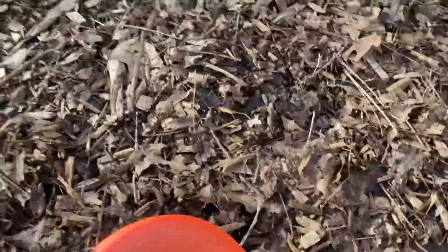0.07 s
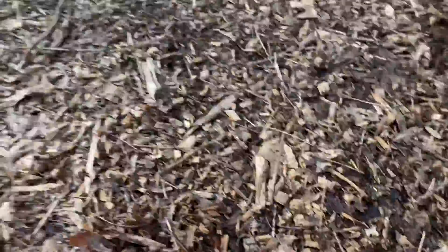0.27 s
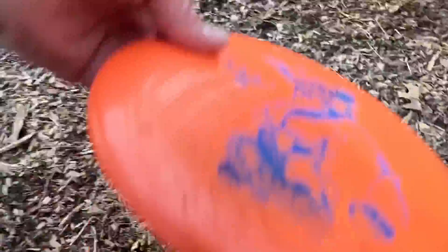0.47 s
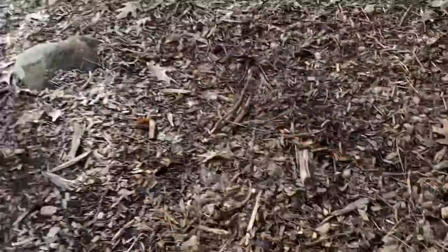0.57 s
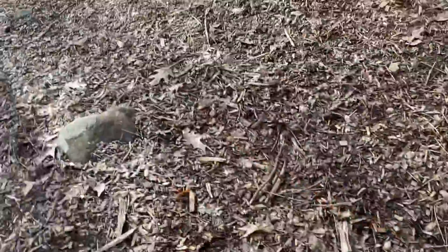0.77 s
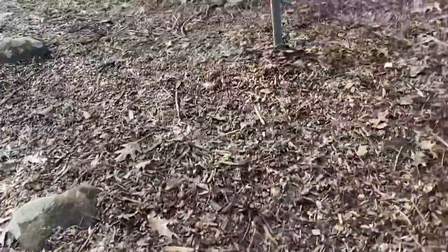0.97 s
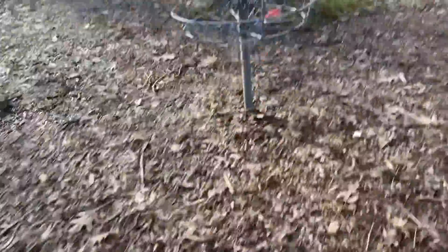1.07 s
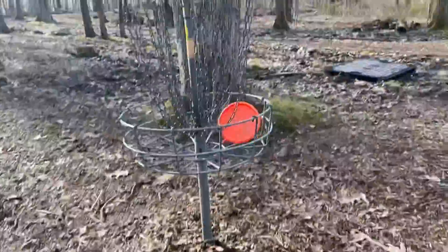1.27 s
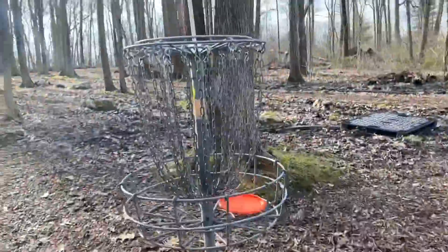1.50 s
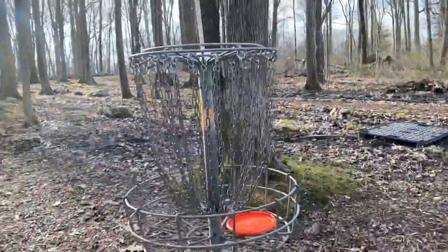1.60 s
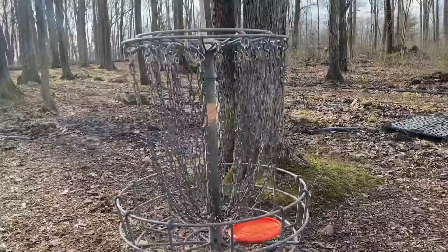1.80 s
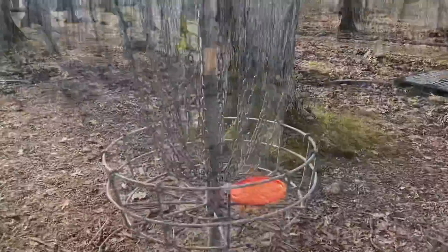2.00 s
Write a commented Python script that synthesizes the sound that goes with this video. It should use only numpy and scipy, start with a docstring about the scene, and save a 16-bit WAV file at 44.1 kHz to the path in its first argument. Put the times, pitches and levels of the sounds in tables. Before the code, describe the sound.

A disc hits a basket's metal chains with a bright clash and jangle in quiet woods.

```python
"""Disc into a chain basket, quiet woods

A plastic disc flies into the chains of a steel basket, knocks against the pole, drops into the
wire tray and settles. The links clash and jingle in surges as the chains swing; pole and tray
ring on, with a weak tail from the trees. Air buffets the moving microphone. A faint chirp
comes from far off, and dry leaves crunch underfoot before the hit and again near the end."""
import sys
import numpy as np
from scipy import signal
from scipy.fft import rfft, irfft, next_fast_len
from scipy.io import wavfile
from scipy.ndimage import uniform_filter1d

SR = 44100
rng = np.random.default_rng(int(sys.argv[2]) if len(sys.argv) > 2 else 0)


def to_wav(s):
    """Save 16-bit WAV."""
    ch = np.atleast_2d(s).T  # columns
    pcm = np.round(np.clip(ch, -1, 1) * 32767)  # PCM
    wavfile.write(sys.argv[1], SR, pcm.astype(np.int16))


N = 90404
TIME = np.arange(N) / SR


def from_db(db):
    """Decibels to gain."""
    return 10 ** (np.asarray(db) / 20)


def at_hz(spectrum, hz):
    """Read a spectrum's level in dB along a log-frequency axis."""
    f, db = np.transpose(spectrum)
    return np.interp(np.log(hz + 1e-3), np.log(f), db)


def level(curve):
    """A dB curve over time as a gain per sample."""
    return from_db(np.interp(TIME, *np.transpose(curve)))


def colour(x, spectrum):
    """Causal (minimum-phase) filter with the given spectrum."""
    size = 2 * next_fast_len(N)
    hz = np.arange(size // 2 + 1) * SR / size
    cepstrum = irfft(np.log(from_db(at_hz(spectrum, hz))))
    cepstrum[1:size // 2] *= 2
    cepstrum[size // 2 + 1:] = 0
    return irfft(rfft(x, size) * np.exp(rfft(cepstrum)))[..., :N]


def noise(spectrum, side_db, envelope=0.99):
    """Stereo noise under an envelope, then coloured; rms 1 where the envelope is 1."""
    mid, side = rng.standard_normal((2, N))
    white = mid + from_db(side_db) * side * [[1], [-1]]
    return colour(envelope * white, spectrum) / np.std(colour(white, spectrum))


def turbulence(spectrum):
    """Low eddy noise, its level evened over a few cycles."""
    eddies = noise(spectrum, side_db=-12.5)
    power = uniform_filter1d(np.mean(eddies ** 2, axis=0), size=1500)
    return eddies / np.sqrt(power + 1e-9)


def rms_one(x):
    """Scale to rms 1."""
    return x / np.sqrt(np.mean(x ** 2) + 1e-20)


def clicks(times, sizes):
    """Impulses at the given times in seconds."""
    samples = np.clip(np.ravel(times) * SR, 0, N).astype(int)
    return np.bincount(samples, np.ravel(sizes), N + 1)[:N]


def fade(x, decay_s):
    """Each impulse becomes an exponential decay."""
    return signal.lfilter([1], [1, -np.exp(-1 / (decay_s * SR))], x + 1e-18)


def ring(force, hz, t60, phase):
    """One mode, reaching the microphone with a left-right phase difference in radians."""
    pole = from_db(-60 / (t60 * SR)) * np.exp(2j * np.pi * hz / SR)
    motion = signal.lfilter([1], [1, -pole], force + 1e-18)
    mid, side = motion.imag * np.cos(phase / 2), motion.real * np.sin(phase / 2)
    return np.array([mid + side, mid - side])


def uneven(shape, spread_db=4.5):
    """Strengths of contacts, with random sign; rms 1 along each row."""
    sizes = from_db(spread_db * rng.standard_normal(shape)) * rng.choice([-1, 1], shape)
    return sizes / np.sqrt(np.mean(sizes ** 2, axis=-1, keepdims=True))


# Airflow right on the microphone: t/s, level/dB
BUFFET_LEVEL = [(0, -40), (.3, -35.5), (.6, -28), (.68, -32), (.97, -28), (1.035, -42.5), (1.13, -40.5),
                (1.22, -40), (1.36, -49), (1.55, -48.5), (1.72, -39), (1.85, -42), (2.05, -45.5)]
# Its rumble: f/Hz, level/dB
BUFFET_SPECTRUM = [(15, -28), (35, -15.5), (55, 1), (85, 3), (125, -4), (200, -16.5), (600, -50),
                   (5000, -92)]
def buffeting():
    """Eddies rumble on the moving microphone."""
    return level(BUFFET_LEVEL) * turbulence(BUFFET_SPECTRUM)


# Air of the woods, far off: f/Hz, level/dB
HUSH_SPECTRUM = [(100, -12.5), (250, -2.5), (500, -6), (950, 2.5), (1600, -8), (3000, -18.5), (7500, -33),
                 (11000, -27), (13000, -40.5)]
def hush():
    """A steady, wide hush lies behind everything."""
    return from_db(-48) * noise(HUSH_SPECTRUM, side_db=1)


# Faint rustle around the microphone: t/s, level/dB
RUSTLE_LEVEL = [(0, -63), (.3, -57), (.72, -56), (.85, -62), (2.05, -66.5)]
# Its hiss: f/Hz, level/dB
RUSTLE_SPECTRUM = [(1000, -7), (2500, 3), (4500, 3), (7200, 1), (8700, -11), (11000, -5.5), (13500, -28)]
def rustle(grain_s=0.0026, spread_db=1.5):
    """Dry leaves shift in tiny grains of uneven strength."""
    grains = rms_one(uniform_filter1d(rng.standard_normal(N), size=int(grain_s * SR)))
    envelope = rms_one(from_db(spread_db * grains))
    return level(RUSTLE_LEVEL) * noise(RUSTLE_SPECTRUM, side_db=-2, envelope=envelope)


# Pitch of a far chirp: t/s, f/Hz
CHIRP_PITCH = [(0.195, 4200), (0.275, 4450), (0.295, 4980), (0.34, 4900), (0.38, 4400)]
def chirp():
    """A thin, fluttering whistle swells, rises and falls."""
    times, hz = np.transpose(CHIRP_PITCH)
    progress = np.interp(TIME, [times[0], times[-1]], [0, 1])
    swell = np.sqrt(np.abs(np.sin(np.pi * progress)))
    flutter = rms_one(uniform_filter1d(uniform_filter1d(rng.standard_normal(N), size=120), size=120))
    phase = 2 * np.pi * np.cumsum(np.interp(TIME, times, hz)) / SR
    return from_db(-60.5) * swell * flutter * np.sin(phase)


# Gusts right on the microphone: t/s, level/dB, half length/s
GUSTS = [(0.293, -28, 0.024), (0.652, -24.5, 0.0059), (0.839, -19.5, 0.012), (0.897, -23, 0.012),
         (1.169, -31.5, 0.044)]
# Their thump: f/Hz, level/dB
GUST_SPECTRUM = [(25, -9.5), (85, 3.5), (150, -0.5), (240, -12.5), (700, -50.5), (5000, -78)]
def gusts():
    """Single puffs of air thump on the microphone, each a bell-shaped swell."""
    envelope = sum(from_db(db) * np.exp(-0.5 * ((TIME - s) / half) ** 2) for s, db, half in GUSTS)
    return envelope * turbulence(GUST_SPECTRUM)


# Leaves and twigs underfoot: t/s, level/dB, decay/s
CRUNCHES = [(0.334, -44, 0.0025), (0.47, -44.5, 0.01), (0.871, -45, 0.006), (0.903, -45, 0.01),
            (0.925, -42, 0.005), (2.003, -45, 0.025), (2.027, -26, 0.00077)]
# Their crunch: f/Hz, level/dB
CRUNCH_SPECTRUM = [(150, 2), (500, -1.5), (1000, 7), (1600, -1), (2500, -1), (3200, -13.5), (14000, -30)]
def leaves():
    """Dry leaves crunch in short bursts, a little right of the microphone."""
    envelope = sum(fade(clicks(s, from_db(db)), decay_s) for s, db, decay_s in CRUNCHES)
    return noise(CRUNCH_SPECTRUM, side_db=-6.5, envelope=envelope) * from_db([[-1.5], [1.5]])


# Clashes of the chains in the basket: t/s, level/dB, decay/s,
# then offsets for low link modes/dB, high link modes/dB, shaking of the basket/dB
SURGES = [(1.0758, -14.5, 0.046, 1.5, -11, -5), (1.107, -20, 0.029, 5.5, -25, -14),
          (1.185, -20.5, 0.022, -1.5, 3.5, -25), (1.235, -22, 0.023, -3, 3, 8.5),
          (1.268, -10, .025, -7.5, 2.5, -5.5), (1.338, -30.5, 0.032, 1.5, 9, 11),
          (1.39, -26.5, .04, -3, -5, 12), (1.432, -19, 0.028, -4.5, 5.5, 5),
          (1.491, -26, .025, 0.5, 2, 14.5), (1.546, -30, .03, 5.5, 2, 11), (1.596, -22, 0.034, -6, -1, 5.5),
          (1.622, -25.5, .025, -4, 4, 6), (1.67, -33, 0.043, 1.5, 10, 15), (1.74, -33.5, 0.014, 6, 11, 7.5),
          (1.778, -31, 0.017, -9, 12.5, -8), (1.98, -45, 0.023, -6, -11, 8)]
def link_contacts(count):
    """Each surge is a run of contacts that thin out and weaken: times and sizes, a row per surge."""
    start, db, decay_s = np.transpose(SURGES)[:3, :, None]
    progress = (np.arange(count) + rng.random((len(start), count))) / count
    age = 3 * progress ** 1.5   # in decay times
    return start + age * decay_s, from_db(db) * np.exp(-age) * 2 / np.sqrt(count)


# Families of link modes: f/Hz, spread/Hz, level/dB, t60/s, left-right phase at the microphone/rad
LINK_MODES = [(6250, 670, -13, 0.082, 1.97), (9790, 413, -12, 0.055, 1.76), (11060, 500, -10, 0.063, 0.15),
              (12750, 131, -6, 0.12, 2.5), (12970, 55, -3, 0.16, 2.58), (14540, 112, -11.5, 0.13, 2.04),
              (15690, 45, -25, 0.14, .5)]
# Tick of link on link: f/Hz, level/dB
TICK_SPECTRUM = [(1000, 0), (3000, 7), (5000, 1), (7300, 14), (8300, -13), (11000, 2), (16000, -21)]
def chains(times, sizes, per_family=12, low_below_hz=11800, high_above_hz=13700):
    """Links tick against each other and ring very high; no two have quite the same pitch."""
    low_db, high_db = np.transpose(SURGES)[3:5, :, None]
    ticks = np.array([clicks(times, sizes * uneven(sizes.shape)) for _ in range(2)])
    jingle = from_db(0.5) * colour(ticks, TICK_SPECTRUM)
    for centre, spread, db, t60, phase in LINK_MODES:
        family_db = db + low_db * (centre < low_below_hz) + high_db * (centre > high_above_hz)
        strength = sizes * from_db(family_db) / np.sqrt(per_family)
        for detune in 2 * (np.arange(per_family) + rng.random(per_family)) / per_family - 1:
            hz = centre + spread * np.pi / 2 * np.arcsin(detune)
            force = clicks(times, strength * uneven(sizes.shape))
            jingle += ring(force, hz, t60, 0.24 * rng.standard_normal() - phase)
    return jingle


# Blows of disc on steel: t/s, level/dB, thud offset/dB, crack offset/dB, basket ring level/dB
KNOCKS = [(1.0770, -10, -16, 0, -37), (1.0795, -4.5, -25, -3, -23.5), (1.1135, -23.5, -9, 12, -33),
          (1.1174, -18.5, -1.5, -1, -30), (1.1206, -28, 8, 7, -32), (1.171, -24.5, -16, 0, -29),
          (1.1916, -21.5, 0.5, 11, -12), (1.2309, -7, -45, -10, -26), (1.2368, -9, -28, -19, -28),
          (1.2548, -13, -2.5, -2, -14.5), (1.2569, -17.5, 6, 7, -35), (1.2655, -17, -10, 3, -19.5),
          (1.2683, -11.5, -2.5, 5.5, -19.5), (1.3783, -26, -7, 12.5, -26), (1.482, -17, -2, 2.5, -17),
          (1.5442, -17.5, -3, 4.5, -17.5), (1.5863, -19.5, 4, 4, -22), (1.638, -38.5, 18.5, 0, -31)]
# Modes of the damped plastic: f/Hz, level/dB, t60/s
DISC_MODES = [(251, -12, 0.038), (421, -13, 0.02), (920, -3.5, 0.0081), (1202, 1, 0.0055),
              (1820, -9.5, .006), (2730, -7.5, .004), (3930, -18, 0.0017)]
# Crack of a blow: f/Hz, level/dB
CRACK_SPECTRUM = [(300, -15), (900, -0.5), (3000, 5.5), (6000, -2.5), (8300, -13.5), (11000, -12),
                  (16000, -27)]
def disc(thud_fade_hz=(490, 1304), contact_hz=4650):
    """Each blow rings the plastic for a few cycles, with a scuff of the rim and a sharp crack."""
    times, db, thud_db, crack_db, _ = np.transpose(KNOCKS)
    crack_envelope = from_db(-13) * fade(clicks(times, from_db(db + crack_db)), decay_s=0.0048)
    crack = noise(CRACK_SPECTRUM, side_db=0.5, envelope=crack_envelope)
    body = np.zeros((2, N))
    for hz, mode_db, t60 in DISC_MODES:
        thud_share = np.interp(hz, thud_fade_hz, [1, 0])
        blows = clicks(times, from_db(db + mode_db + thud_db * thud_share))
        scuff = from_db(-17) * fade(blows, decay_s=0.0025) * rng.standard_normal(N)
        # a mode radiates little below its pitch
        low_cut = signal.butter(1, hz / 2, "high", fs=SR, output="sos")
        body -= ring(signal.sosfilt(low_cut, blows + scuff), hz, t60, 0.5 * rng.standard_normal())
    softness = signal.butter(2, contact_hz, fs=SR, output="sos")   # soft plastic carries little treble
    return crack + signal.sosfilt(softness, body)


# Strongest modes of pole and tray: f/Hz, level/dB, t60/s
BASKET_MODES = [(538.6, -33, 1.14), (810, -34, 1.6), (1022, -33.5, 1.06), (1848, -28, 0.3),
                (2255, -31, 0.28), (2387, -40, 1.5), (2772, -35, 1.2), (3108, -34.5, 1.2),
                (3680, -34, 0.63), (4264, -35.5, 0.45)]
# Crowd of weaker wire modes: f/Hz, level/dB
WIRE_SPECTRUM = [(230, -10), (600, -8.5), (1000, -2), (1700, -9.5), (2900, 1.5), (4600, 1.5), (7000, -6.5),
                 (8500, -22)]
def basket(times, sizes, count=240, split=0.004):
    """Pole and wire tray ring in many long modes, struck by the disc and shaken by the chains."""
    knock_times, *_, ring_db = np.transpose(KNOCKS)
    shake = sizes * from_db(-7.5 + np.array(SURGES)[:, -1:])
    # each strong mode rings as two close pitches that beat
    pairs = [(hz * (1 + side * split), db - 10 * np.log10(2), t60)
             for hz, db, t60 in BASKET_MODES for side in (-1, 1)]
    root_span = np.sqrt([WIRE_SPECTRUM[0][0], WIRE_SPECTRUM[-1][0]])
    pitches = np.interp(np.arange(count) + rng.random(count), [0, count], root_span) ** 2
    wire_db = -13 - 10 * np.log10(count)
    wires = [(hz, wire_db + at_hz(WIRE_SPECTRUM, hz), 0.58 * np.sqrt(2000 / hz)) for hz in pitches]
    steel = np.zeros((2, N))
    for hz, db, t60 in pairs + wires:
        struck = clicks(knock_times, from_db(ring_db) * uneven(knock_times.shape))
        shaken = clicks(times, shake * uneven(sizes.shape))
        phase = 0.98 * np.sqrt(hz / 2000) * rng.standard_normal()
        steel += ring(from_db(db) * (struck + shaken), hz, t60, phase)
    return steel


# Sound coming back from the surrounding trees: f/Hz, level/dB
WOODS_SPECTRUM = [(150, -8), (900, 2), (3000, -6), (8000, 3), (16000, -24)]
def woods(clash, t60=0.87, rise_s=0.01):
    """Trunks scatter a weak, airy tail back to the microphone."""
    tail = noise(WOODS_SPECTRUM, side_db=0) * from_db(-60 * TIME / t60) * (1 - np.exp(-TIME / rise_s))
    tail /= np.sqrt(np.sum(tail ** 2) / 2)
    return from_db(-19.5) * signal.fftconvolve(clash, tail, axes=-1)[:, :N]


# Modes of the loaded tray: f/Hz, level/dB, t60/s
TRAY_MODES = [(444.5, -17, 0.053), (624, -21, 0.035), (743, -27, 0.082), (977, -25, 0.081)]
def landing(at_s=1.2662):
    """The disc drops flat onto the tray, which answers with a short hollow clunk."""
    return -sum(ring(clicks(at_s, from_db(db)), hz, t60, phase=0) for hz, db, t60 in TRAY_MODES)


def link_ping(at_s=1.739, chatter_s=0.0093):
    """One link chatters briefly and rings out alone."""
    chatter = fade(clicks(at_s, from_db(-31)), chatter_s) * rng.standard_normal(N)
    return ring(chatter / np.sqrt(chatter_s * SR / 2), hz=4700, t60=0.046, phase=0.99)


def scene():
    """Disc, chains and basket among the trees, heard from a moving stereo microphone."""
    ambience = buffeting() + hush() + rustle() + chirp() + gusts() + leaves()
    times, sizes = link_contacts(count=24)
    clash = chains(times, sizes) + disc() + basket(times, sizes) + landing() + link_ping()
    return ambience + clash + woods(clash)


def record(dry, cutoff_hz=16100):
    """The microphone signal passes a steep low-pass that cuts the very top."""
    return signal.sosfilt(signal.ellip(10, 0.2, 80, cutoff_hz, fs=SR, output="sos"), dry)


dry = scene()
out = record(dry)
to_wav(out)
```